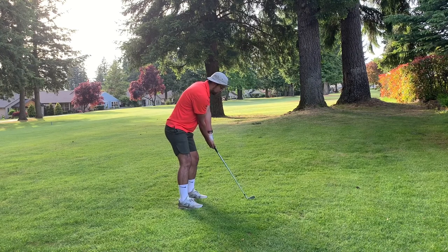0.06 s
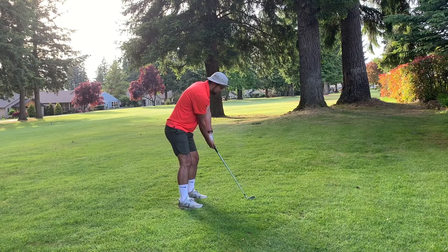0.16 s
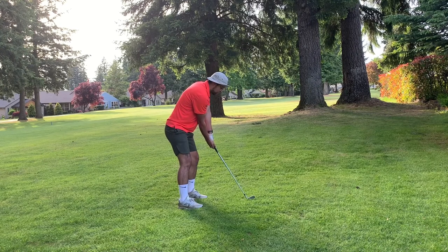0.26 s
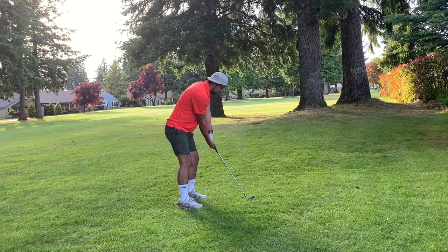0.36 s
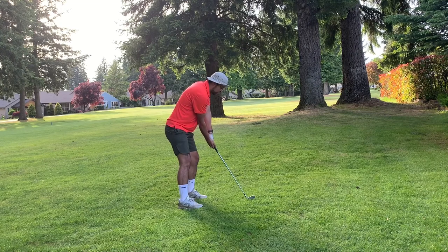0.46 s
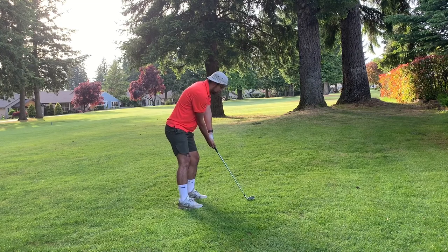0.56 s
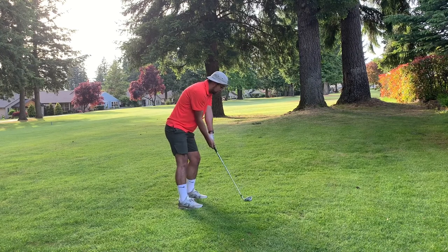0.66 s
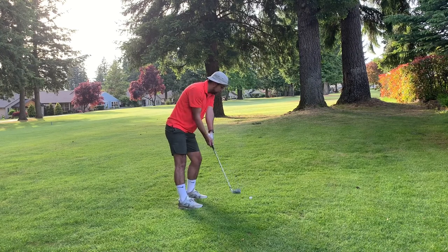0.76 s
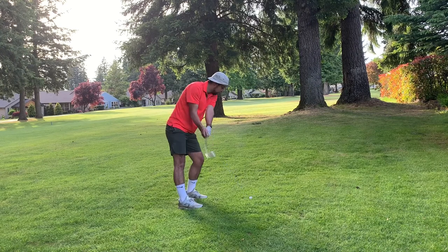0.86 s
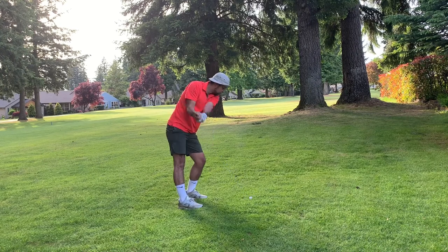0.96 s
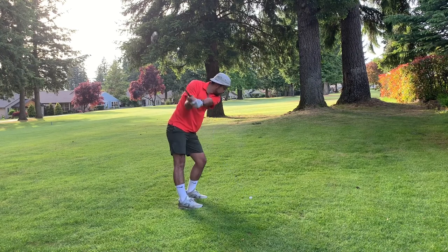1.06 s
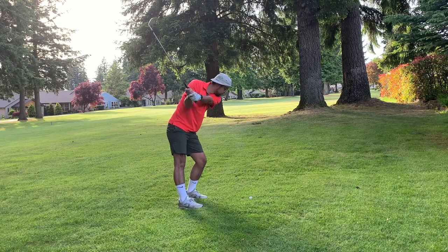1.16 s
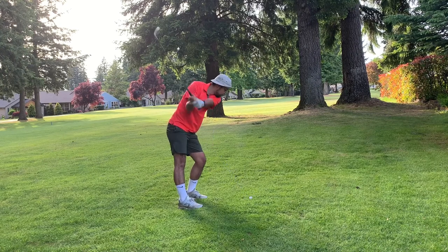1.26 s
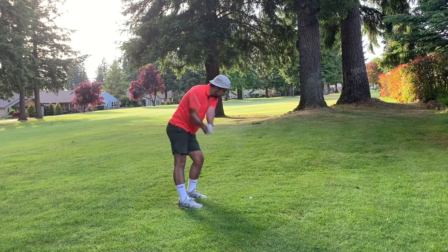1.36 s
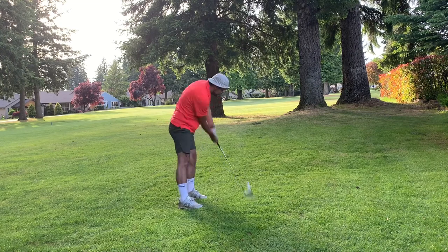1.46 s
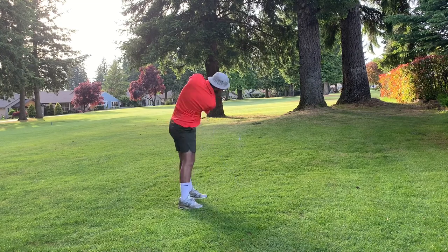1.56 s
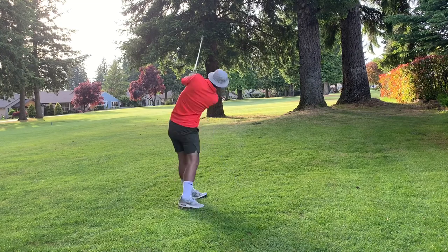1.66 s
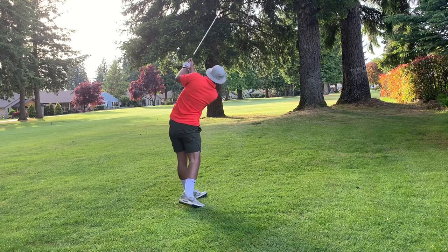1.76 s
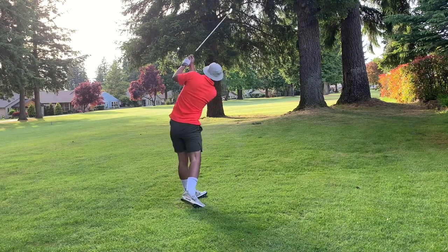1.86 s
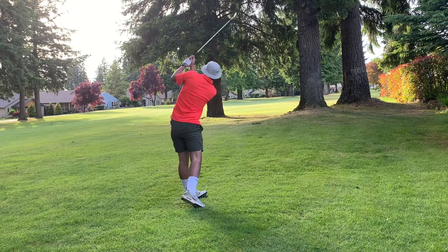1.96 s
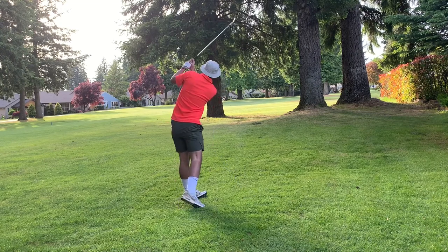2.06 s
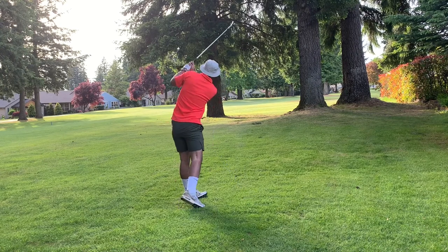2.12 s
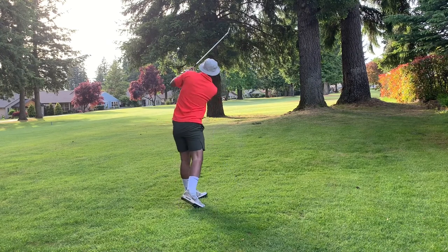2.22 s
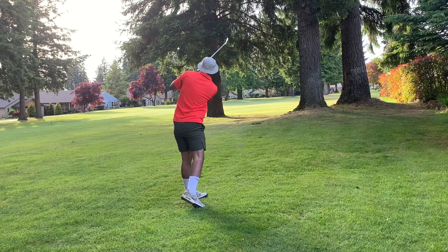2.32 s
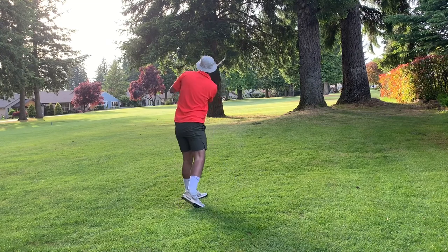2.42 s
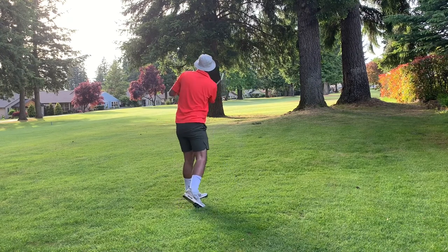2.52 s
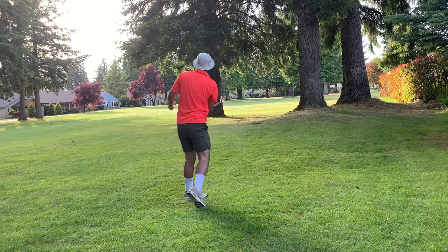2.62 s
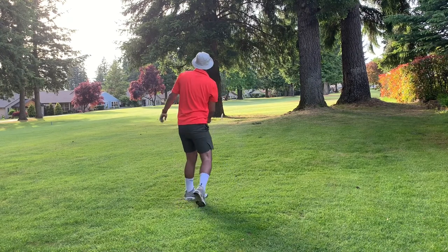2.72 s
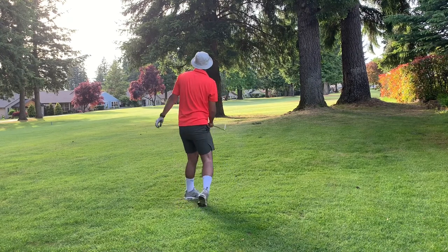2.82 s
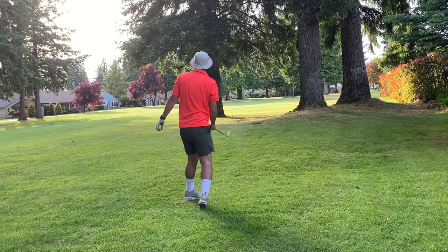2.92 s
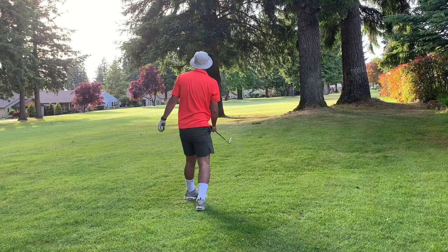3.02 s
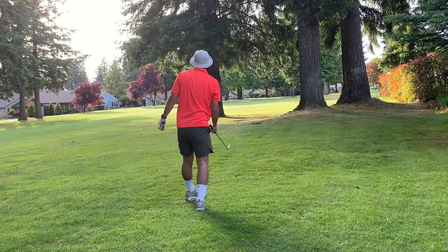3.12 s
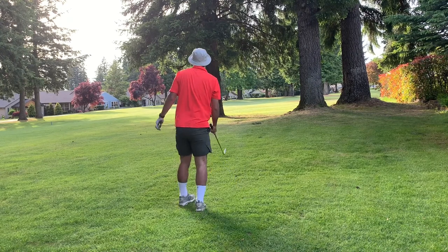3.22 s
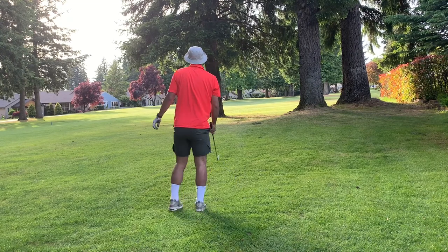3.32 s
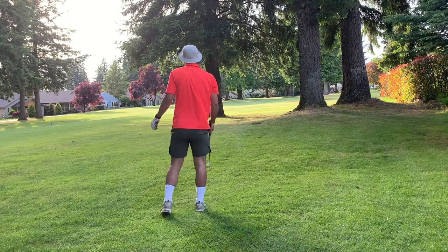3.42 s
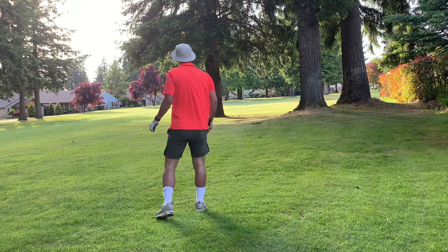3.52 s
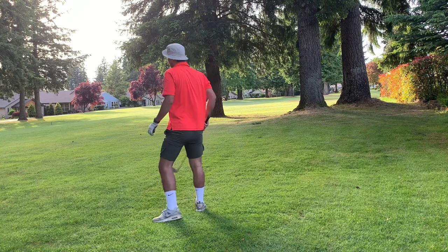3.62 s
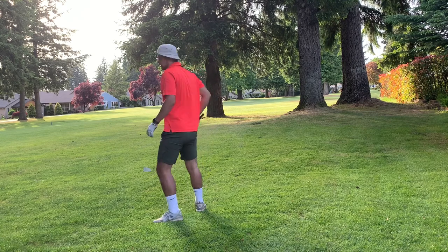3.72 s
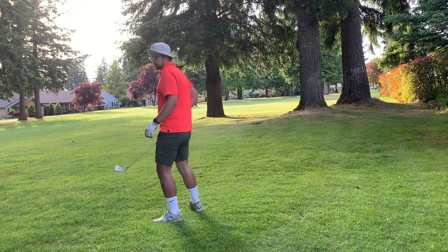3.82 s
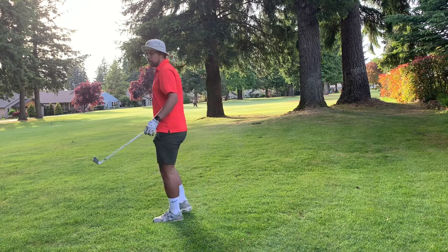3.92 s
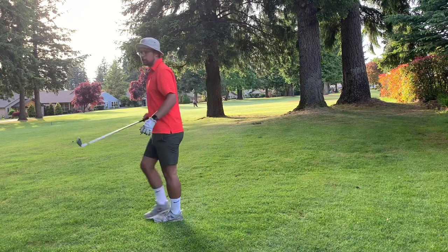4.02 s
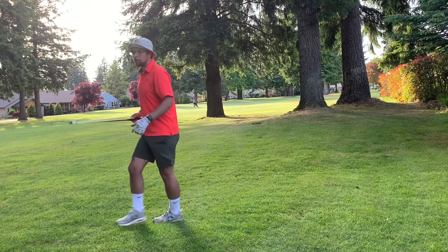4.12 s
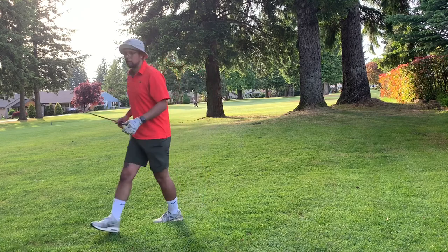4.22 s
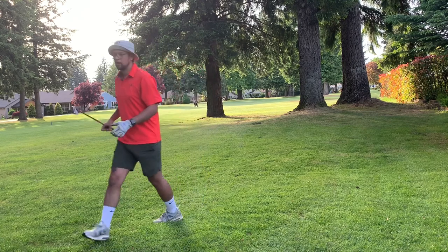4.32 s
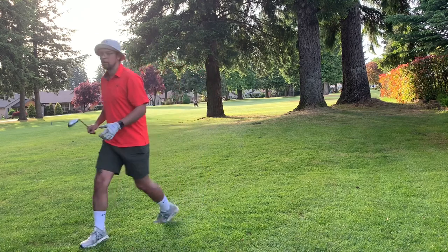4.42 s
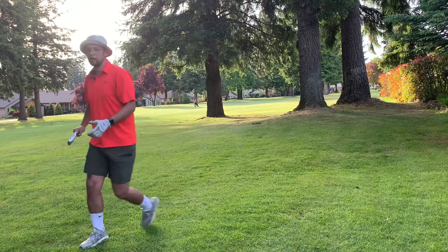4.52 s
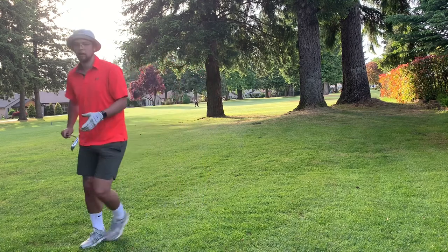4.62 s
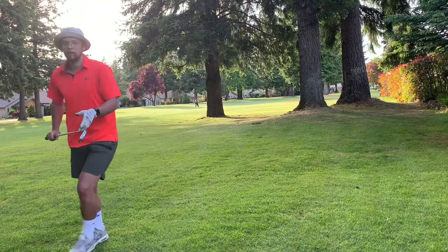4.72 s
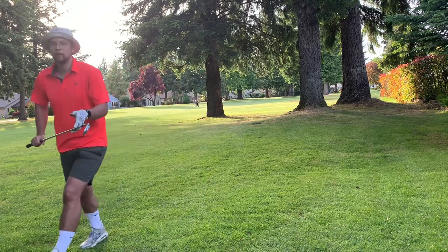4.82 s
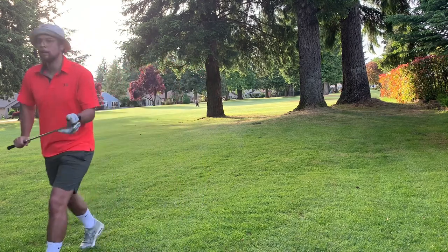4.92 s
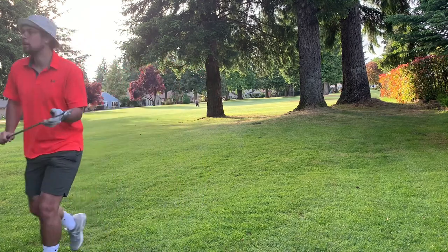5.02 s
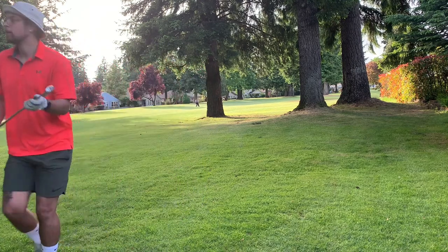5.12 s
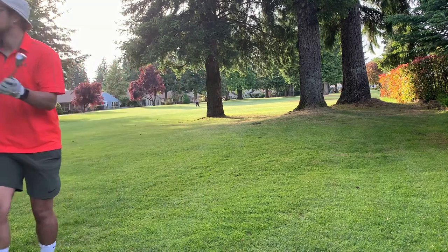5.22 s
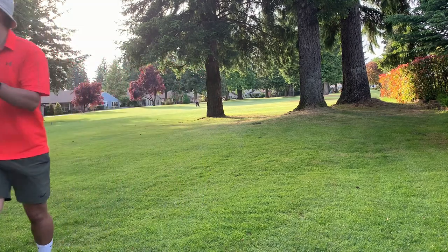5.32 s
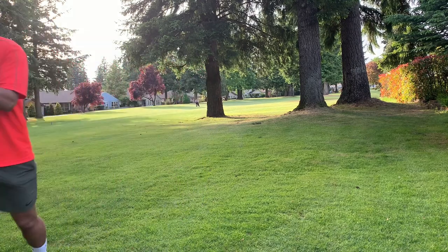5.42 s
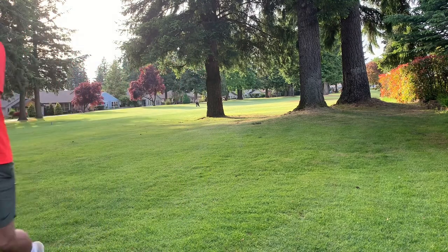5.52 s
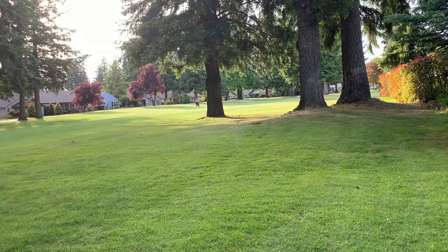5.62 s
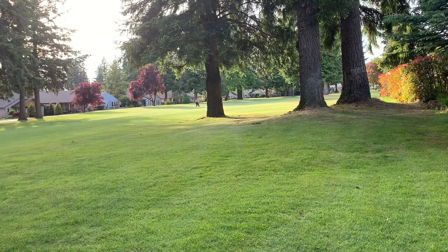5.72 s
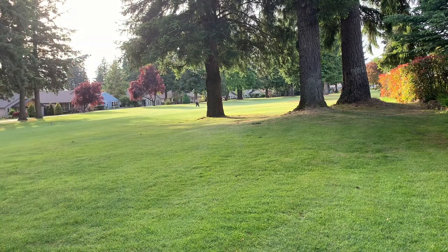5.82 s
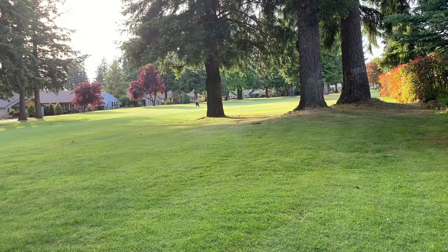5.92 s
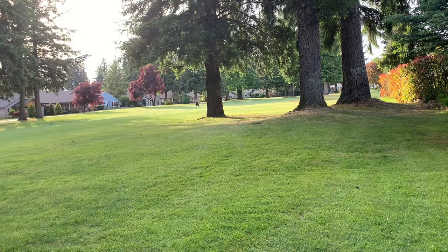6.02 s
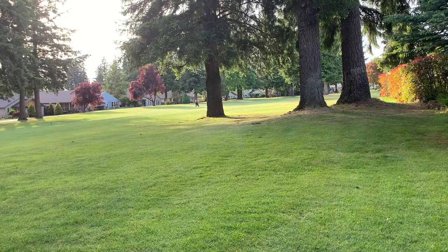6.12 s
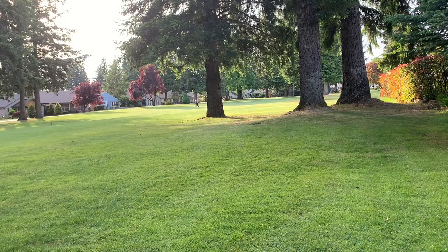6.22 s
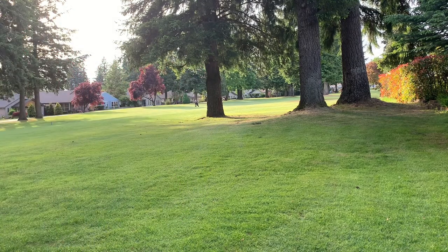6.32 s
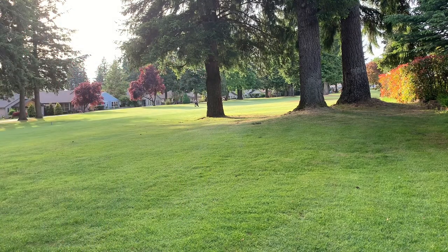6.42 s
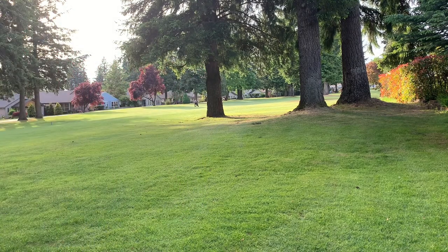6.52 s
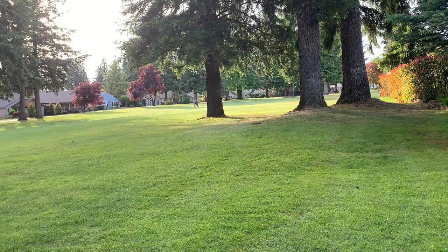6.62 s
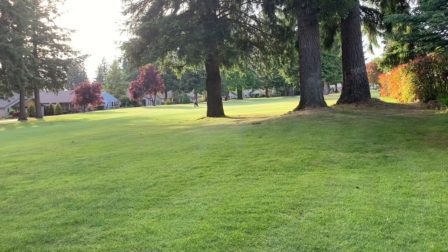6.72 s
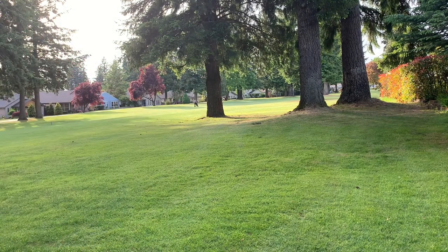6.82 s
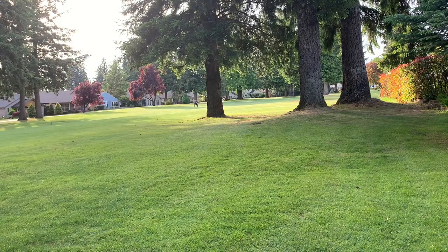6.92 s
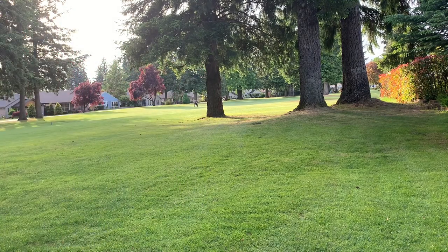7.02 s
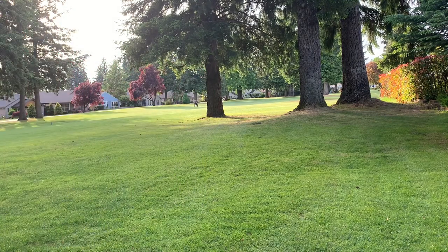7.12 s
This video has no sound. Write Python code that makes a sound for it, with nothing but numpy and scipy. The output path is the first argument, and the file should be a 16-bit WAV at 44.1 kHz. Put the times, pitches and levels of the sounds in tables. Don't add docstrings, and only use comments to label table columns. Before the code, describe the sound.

A golf club swishes through grass and cracks a ball sharply, echoing off trees, then grassy footsteps pass close by amid birdsong and distant traffic hum.

```python
import sys
import numpy as np
from scipy import signal
from scipy.fft import rfft, irfft, next_fast_len
from scipy.io import wavfile
from scipy.ndimage import uniform_filter1d

SR = 44100
rng = np.random.default_rng(int(sys.argv[2]) if len(sys.argv) > 2 else 0)


def int16_out(signal):
    q = np.round(np.clip(np.atleast_2d(signal).T, -1, 1) * 32767)
    wavfile.write(sys.argv[1], SR, q.astype(np.int16))


def rack_gain(trim_db):
    fader = np.asarray(trim_db, float)
    return 10 ** (fader / 20)


N = 316197
T = np.arange(N) / SR


def evened(x):
    return x / np.sqrt(np.mean(x ** 2) + 1e-20)


def read(points, hz):
    f, value = np.transpose(points)
    return np.interp(np.log(hz + 1), np.log(f + 1), value)


def curve(rows, column, t=T):
    rows = np.asarray(rows)
    return np.interp(t, rows[:, 0], rows[:, column])


def slope(start, end, rise_db_per_s, fade_db_per_s, t=T):
    return rack_gain(-rise_db_per_s * np.maximum(start - t, 0) - fade_db_per_s * np.maximum(t - end, 0))


def filtered(x, order, hz, kind="low"):
    return signal.sosfilt(signal.butter(order, hz, kind, fs=SR, output="sos"), x)


def coloured(x, points):
    size = next_fast_len(N)
    gain = rack_gain(read(points, np.fft.rfftfreq(size, 1 / SR)))
    return evened(irfft(rfft(x, size) * gain, size)[..., :N])


def pair(x, lag, lean_db=-4.0):
    size = next_fast_len(N)
    delay = np.exp(-2j * np.pi * np.fft.rfftfreq(size) * lag)
    late = irfft(rfft(x, size) * delay, size)[:N]
    return np.array([rack_gain(lean_db / 2) * late, rack_gain(-lean_db / 2) * x])


def crackle(per_s, spread_db, share):
    size = rack_gain(spread_db * np.minimum(rng.exponential(1, N), 4))
    snaps = rng.standard_normal(N) * size * (rng.random(N) < per_s / SR)
    share = np.clip(share, 0, 1)
    return np.sqrt(share) * evened(snaps) + np.sqrt(1 - share) * rng.standard_normal(N)


def scatter(shape, seconds, t60):
    t = np.arange(int(seconds * SR)) / SR
    hits = rng.random((2, len(t))) < .05
    taps = rng.standard_normal((2, len(t))) * hits * rack_gain(-60 * t / t60)
    taps /= np.linalg.norm(taps, axis=1, keepdims=True)
    return signal.fftconvolve(shape[None], taps, axes=1)[:, :N]


# f/Hz, level/dB [per Hz]
TRAFFIC_TONE = [(15, -59), (25, -28.5), (50, -1.5), (105, 1.5), (150, -6), (210, -9.5), (270, -17),
                (400, -19.5), (950, -16), (1400, -24), (2000, -32), (3500, -42.5), (5000, -49.5),
                (7000, -63.5)]
# f/Hz, level/dB [per Hz]
LEAF_TONE = [(2500, -67), (5000, -59.5), (6700, -62), (8500, -53), (11000, -60), (15600, -62),
             (16000, -100)]
# f/Hz, likeness [0-1]
LIKENESS = [(60, 0.94), (250, 1), (450, 0.62), (1200, .5), (2000, 0.076), (4000, 0.055), (8000, 0.078)]
# f/Hz, level/dB
BED_BALANCE = [(60, -1.1), (240, -1.5), (950, 2.5), (3770, 0.28), (15000, -1.7)]
# t/s, level/dB
TRAFFIC_DRIFT = [(0, 0.5), (1.0, 0), (2.2, -1), (3.5, -0.5), (4.8, -0.2), (6.0, -0.3), (7.2, -1.1)]


def traffic(level_db=-44, patchy_db=1.42, split_hz=260, lag=18):
    frames, hz = N // 256 + 5, np.fft.rfftfreq(1024, 1 / SR)
    a, b, c, d, patches = rng.standard_normal((frames, 513, 5)).T
    patches = uniform_filter1d(uniform_filter1d(patches, size=10, axis=0), size=14, axis=1)
    patches = evened(patches)
    t = np.arange(frames) * 256 / SR
    bass = 1 / (1 + (hz[:, None] / split_hz) ** 4)
    drift_db = (1 - bass + 0.64 * bass) * curve(TRAFFIC_DRIFT, 1, t)
    same = np.clip(read(LIKENESS, hz), -1, 1)[:, None]
    left = a + 1j * b
    late = left * np.exp(-2j * np.pi * hz[:, None] * lag / SR)
    right = same * late + np.sqrt(1 - same ** 2) * (c + 1j * d)
    spectra = np.array([left, right]) * rack_gain(patchy_db * patches + drift_db)
    flat = signal.istft(spectra, nperseg=1024, noverlap=768)[1][:, :N]
    size = next_fast_len(N)
    hz = np.fft.rfftfreq(size, 1 / SR)
    tone = np.hypot(rack_gain(read(TRAFFIC_TONE, hz)), rack_gain(read(LEAF_TONE, hz)))
    lean = rack_gain(np.outer([.5, -.5], read(BED_BALANCE, hz)))
    return rack_gain(level_db) * evened(irfft(rfft(flat, size) * tone * lean, size)[:, :N])


# t/s [start], length [s], level/dB
BUZZES = [
    (-.1, 0.094, -59),
    (0.418, 0.25, -62),
    (2.46, 0.16, -64),
    (4.051, 0.093, -63),
    (5.362, 0.14, -67.5),
    (6.64, .03, -72),
    (6.925, .035, -78),
    (7.033, .07, -74),
]


def buzz(warble_hz=180, swing_hz=740, jitter=0.19, upper_db=-25):
    pitch_hz, droop_hz = 7713, 250
    clean_s, widen_s, rise_s = .022, .022, .007
    sag_db, fade_db_per_s = -6, 480
    out = np.zeros(N)
    wander = evened(uniform_filter1d(rng.standard_normal(N), size=200))
    for start, length, db in BUZZES:
        inside = (T >= start) & (T < start + length + .08)
        t = T[inside] - start
        rate_hz = warble_hz * (1 - 0.25 * t + jitter * wander[inside])
        swing = np.sin(2 * np.pi * np.cumsum(rate_hz) / SR)
        clean = clean_s * np.clip(length / .26, 0, 1) ** 2
        swing *= np.clip((t - clean) / widen_s, .08, 1)
        onset = 600 * np.exp(-np.maximum(t - .008, 0) / .007)
        droop = droop_hz * np.clip(t / length, 0, 1) ** 3
        turns = np.cumsum(pitch_hz - droop + onset + swing_hz * swing) / SR
        upper = np.sin(2 * np.pi * np.cumsum(10600 + 350 * swing) / SR)
        note = np.sin(2 * np.pi * turns) + rack_gain(upper_db) * np.clip(length / 0.31, 0, 1) ** 3 * upper
        sag = np.where(t < length, (t / length) ** 2, 1)
        level = rack_gain(db + sag_db * sag) * slope(rise_s, length, 30 / rise_s, fade_db_per_s, t)
        out[inside] += evened(note * (1 + 0.79 * swing)) * level
    echo = rack_gain(-1) * scatter(out, .1, .16)
    return rack_gain(5.0) * (pair(out, 12.4) + echo)


# t/s, length [s], f/Hz [start], f/Hz [end], level/dB
LEFT_BIRD = [(0, .02, 2890, 2820, -54.5), (.04, 0.028, 3090, 2900, -61), (.07, 0.043, 2930, 2880, -67),
             (.135, .048, 2980, 3076, -60.5), (.195, .08, 3050, 2267, -57), (.215, .1, 3090, 2900, -68),
             (.73, .04, 3070, 3000, -71), (.78, .034, 3050, 3010, -74), (5.38, .06, 2940, 2940, -78),
             (5.5, 0.17, 2940, 3000, -70), (5.675, .038, 3100, 3070, -70), (5.715, .035, 3030, 3050, -64.5),
             (6.95, 0.1, 3260, 3160, -74)]
FAR_BIRD = [(.026, 0.009, 5300, 4950, -69), (.038, .009, 5150, 4800, -70), (.058, .006, 5600, 4400, -73),
            (.095, .01, 5360, 4900, -75), (.107, .009, 5200, 4700, -76), (.125, .007, 5500, 4500, -75),
            (.165, .01, 5400, 4900, -75), (.177, .009, 5200, 4700, -74), (.195, .007, 5500, 4500, -76),
            (4.17, .28, 4690, 4650, -75), (5.055, .035, 5230, 4400, -65.5), (5.115, .051, 5250, 4200, -64)]
ARCH_BIRD = [
    (5.235, .081, 4250, 3925, -62),
    (6.085, .12, 2960, 4250, -66),
]
HIDDEN_BIRD = [(3.79, .22, 2693, 2590, -70), (3.81, .19, 3610, 3480, -72), (1.955, .04, 4250, 4050, -72),
               (1.985, .03, 4000, 3690, -70.5), (2.075, 0.064, 4900, 4480, -69),
               (2.11, 0.045, 4870, 4600, -74), (2.12, .035, 3835, 3850, -71),
               (4.552, 0.048, 3480, 3670, -59), (4.575, 0.0495, 4150, 3950, -57.5),
               (4.592, 0.042, 3600, 3370, -58), (5.06, 0.061, 4020, 4020, -70),
               (5.06, .03, 3700, 3600, -64), (4.64, 0.051, 3600, 3460, -67), (6.67, .05, 4800, 4600, -68.5),
               (6.69, 0.048, 4520, 4520, -76)]


def whistles(rows, lag, echo_db, arch_hz=0, waver_hz=40, flutter_db=3):
    out = np.zeros(N)
    waver, flutter = evened(uniform_filter1d(rng.standard_normal((2, N)), size=180))
    for s, length, start_hz, end_hz, db in rows:
        u = np.linspace(0, 1, int(length * SR))
        first = max(round(s * SR), 0)
        at = slice(first, first + len(u))
        glide = start_hz + (end_hz - start_hz) * u + 4 * arch_hz * u * (1 - u) + waver_hz * waver[at]
        level = rack_gain(db + flutter_db * flutter[at]) * np.sqrt(abs(np.sin(np.pi * u)))
        out[at] += level * np.sin(2 * np.pi * np.cumsum(glide) / SR)
    echo = rack_gain(echo_db) * scatter(out, .2, .25)
    return pair(out, lag) + echo


def spray():
    t = T - 1.453
    mow = rack_gain(-37) * slope(0, 0, 2997.5, 0, t)
    swish = rack_gain(-58) * slope(0, 0, 561, 0, t)
    burst = rack_gain(-41.5) * slope(0, 0.011, 0, 899.5, t)
    flying = rack_gain(-56.5 - 69.5 * t) * slope(0, .15, 0, 199, t)
    crumbs = rack_gain(-71.5 - 21 * t)
    return np.where(t < 0, mow + swish, burst + flying + crumbs)


# f/Hz, level/dB [per Hz]
SPRAY_TONE = [(400, -25), (900, -14), (2000, -5), (3700, -7.5), (6000, -9.5), (8500, -8), (11000, -12),
              (15000, -13.5), (16200, -38)]


def divot(dulling_db=-50):
    hiss = coloured(crackle(per_s=3800, spread_db=1.0, share=0.79), SPRAY_TONE) * spray() * rack_gain(3.5)
    dull = signal.sosfiltfilt(signal.butter(2, 6000, fs=SR, output="sos"), hiss)
    hiss = dull + (hiss - dull) * rack_gain(dulling_db * np.clip(T - 1.47, 0, 1))
    return pair(hiss, 0.99) + scatter(hiss, .05, .03)


# t/s, level/dB [peak], f/Hz [ring], time to the peak [s]
BLOW = [(1.4529, -4, 1950, .00038), (1.45446, -8.5, 2000, .00045), (1.45594, -12, 1300, .001),
        (1.45275, -10, 7800, .0005), (1.4527, -13, 6050, .0004), (1.4524, -21, 12500, .0002),
        (1.4525, -23, 15000, .0002), (1.4527, -15, 4900, .0004), (1.4530, -21, 3800, .0004),
        (1.4546, -22, 6800, .0004), (1.4556, -19, 9200, .0005), (1.4558, -24, 13000, .0004),
        (1.4545, -28, 2800, .0012), (1.4527, -18, 9600, .0004)]
# t/s, level/dB [peak], f/Hz [ring], time to the peak [s]
THUMP = [
    (1.4545, -22, 850, .0012),
    (1.4530, -24.5, 440, 0.0033),
    (1.4530, -28.5, 250, 0.0037),
]


def strike():
    out = np.zeros(N)
    for s, db, hz, rise in BLOW + THUMP:
        start = int(s * SR)
        t = np.maximum(T[start:start + 2000] - s, 0)
        swell = (t / rise * np.exp(1 - t / rise)) ** 2
        out[start:start + len(t)] += rack_gain(db) * swell * np.sin(2 * np.pi * hz * t)
    return filtered(out, 2, 170, "high")


# t/s [delay], level/dB
TREE_PATTER = [(.006, -29.5), (.015, -32.5), (.03, -41), (.06, -35), (.15, -36.5), (.165, -46.5), (.3, -55),
               (.6, -69)]
# t/s [delay], level/dB, lag of the left microphone [samples]
TRUNKS = [
    (.0915, -33, 5),
    (.1375, -32, -6),
    (.273, -39, 15),
    (.378, -47, 0),
]


def trees(blow, dull_hz=4600):
    t = np.arange(int(.7 * SR)) / SR
    hits = rng.random((2, len(t))) < .006
    taps = rng.standard_normal((2, len(t))) * hits * rack_gain(curve(TREE_PATTER, 1, t) + 4.0) * (t > .006)
    for delay, db, lag in TRUNKS:
        taps[[0, 1], [int(delay * SR + lag), int(delay * SR)]] += rack_gain(db)
    crack = blow * rack_gain(-1600 * np.clip(T - BLOW[0][0], 0, .004))
    far = filtered(crack, 2, dull_hz)
    far = far + 1.5 * filtered(far, 2, [2900, 4300], "band")
    return signal.fftconvolve(far[None], taps, axes=1)[:, :N]


# t/s [middle], length [s], level/dB [hiss], level/dB [scuff]
SWINGS = [(2.918, 0.044, -80, -86), (3.25, 0.17, -77, -89), (3.433, 0.13, -77.5, -88), (3.65, .1, -80, -84),
          (3.888, 0.094, -72, -81.5), (4.072, .06, -97, -80), (4.25, 0.15, -77, -82),
          (4.44, 0.072, -77.5, -78), (4.595, 0.13, -67.5, -75), (4.82, 0.22, -72, -80),
          (5.276, 0.18, -68, -82), (5.62, 0.065, -77, -71.5), (5.704, .075, -65, -75.5),
          (5.85, 0.15, -72, -91), (6.01, 0.15, -71, -87), (6.748, 0.24, -72.5, -87),
          (7.003, .05, -82, -79.5), (7.1, 0.059, -77, -81)]
# t/s [start], hold [s], level/dB [hiss], level/dB [scuff]
PLANTS = [
    (5.161, 0.0091, -62.5, -73),
    (5.375, 0.067, -69.5, -78),
    (6.16, 0.22, -64.5, -78),
    (6.583, 0.017, -72.5, -87),
]
# t/s, level/dB
NEARNESS = [(2.8, -92), (4.3, -87), (5.2, -82), (6.3, -76), (7.17, -86.5)]


def tread():
    level = rack_gain(curve(NEARNESS, 1) + np.array([[0], [-3.5]]))
    for s, length, *db in SWINGS:
        edge_db = -8 * abs(2 * (T - s) / length) ** 1.22
        level = np.hypot(level, rack_gain(np.array(db)[:, None] + edge_db))
    for s, hold, *db in PLANTS:
        level = np.hypot(level, rack_gain(np.array(db))[:, None] * slope(s, s + hold, 900, 198))
    return level * np.clip((T - NEARNESS[0][0]) / .05, 0, 1)


# t/s, level/dB [peak]
SNAPS = [(4.5979, -53.5), (5.1576, -53), (5.1642, -49), (5.2437, -52), (5.3805, -55), (5.6595, -42),
         (5.6804, -51), (5.684, -53), (5.7134, -44), (6.0716, -50), (6.1569, -49), (6.2251, -48),
         (6.5824, -57), (6.772, -56), (6.8114, -59)]
# f/Hz, level/dB [per Hz]
BLADE_TONE = [(5000, -15), (7500, -5), (10500, -2), (12000, -3), (14500, -2.5), (15750, -3), (16000, -46)]


def steps():
    hiss_level, scuff_level = tread()
    hiss = coloured(crackle(per_s=3000, spread_db=6.0, share=0.42), BLADE_TONE) * hiss_level * rack_gain(5.0)
    snap_s, snap_db = np.transpose(SNAPS)
    stalks = np.zeros(N)
    stalks[(snap_s * SR).astype(int) + SR // 1200] = rack_gain(snap_db + 19)
    stalks = filtered(stalks, 2, [11000, 15000], "band")
    scuff_tone = [(900, -43), (2000, -1.0), (3500, -0.5), (6000, -5), (7500, -4.5), (10000, -21.5)]
    scuff = coloured(crackle(per_s=1500, spread_db=2.0, share=.3), scuff_tone) * scuff_level * rack_gain(9.5)
    brush = hiss + scuff
    near = rack_gain(-5) * scatter(brush, .05, .05)
    lead = np.interp(T, [3.5, 5.2, 6.3, 7.2], [0, 8, 13, 16]) / SR
    return np.array([np.interp(T + lead, T, brush), brush]) + near + stalks


# t/s, level/dB [peak]
HEELS = [
    (5.139, -37),
    (5.338, -28),
    (5.439, -29),
    (5.729, -38),
]


def heels(ring_hz=56.4, rise_s=0.013):
    t = np.maximum(T - np.array(HEELS)[:, :1], 0)
    u = t / rise_s
    push = (u * np.exp(1 - u)) ** 2 * np.sin(2 * np.pi * ring_hz * t)
    return (rack_gain(np.array(HEELS)[:, 1:] - 4.5) * push).sum(axis=0)


def scene():
    birds = buzz() + whistles(LEFT_BIRD, -13, echo_db=-3, waver_hz=35)
    birds += whistles(FAR_BIRD, -9, echo_db=-9, waver_hz=20)
    birds += whistles(ARCH_BIRD, -9, echo_db=-9, arch_hz=352, waver_hz=20, flutter_db=2)
    birds += whistles(HIDDEN_BIRD, 20, echo_db=-4, waver_hz=50, flutter_db=3.5)
    blow = strike()
    shot = divot() + pair(blow, 0, lean_db=-1.7) + trees(blow)
    return traffic() + birds + shot + steps() + heels()


def roll_off(x):
    return signal.sosfilt(signal.butter(12, 16650, fs=SR, output="sos"), x)


def record(dry):
    split_hz, lag, shared, edge_hz, open_db = 8500, 13.12, .96, 15790, -62
    high = signal.sosfiltfilt(signal.butter(4, split_hz, "high", fs=SR, output="sos"), dry)
    own = high[0] * [[1], [-1]]
    built = shared * pair(high[1], lag, lean_db=-1.0) + np.sqrt(1 - shared ** 2) * own
    both = dry - high + built
    top = irfft(rfft(both) * (np.fft.rfftfreq(N, 1 / SR) > edge_hz), N)
    shut = uniform_filter1d((top ** 2).mean(axis=0), size=256) < rack_gain(open_db) ** 2
    mix = both - top * uniform_filter1d(1. * shut, size=128)
    return roll_off(mix)


dry = scene()
out = record(dry)
int16_out(out)
```